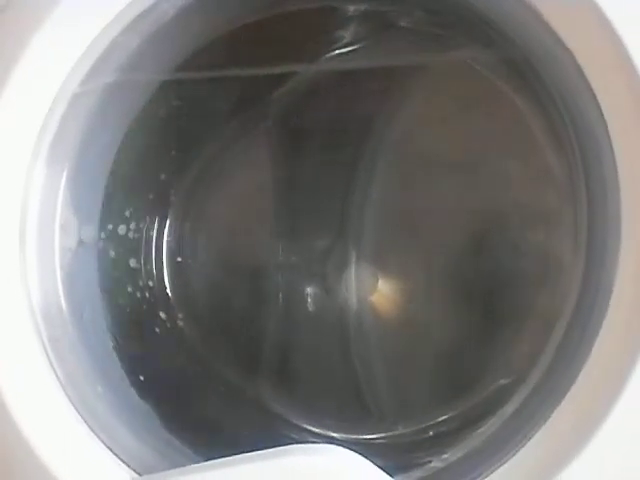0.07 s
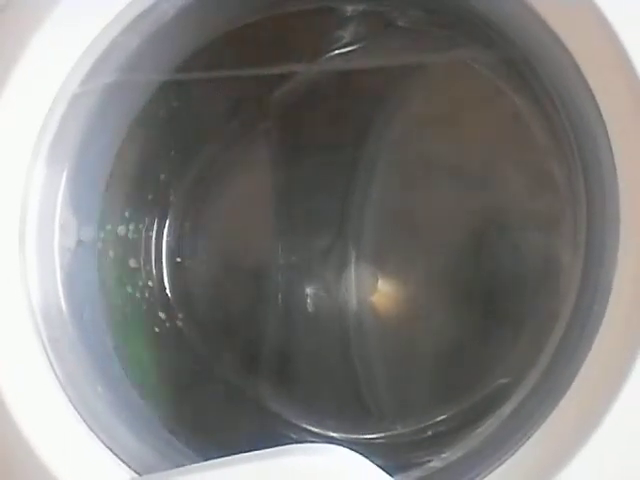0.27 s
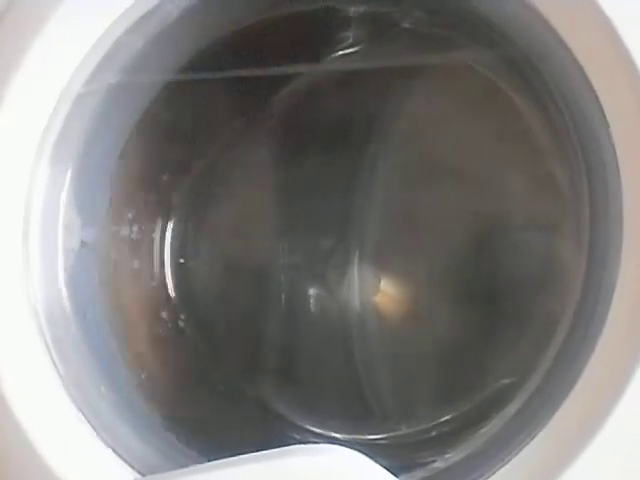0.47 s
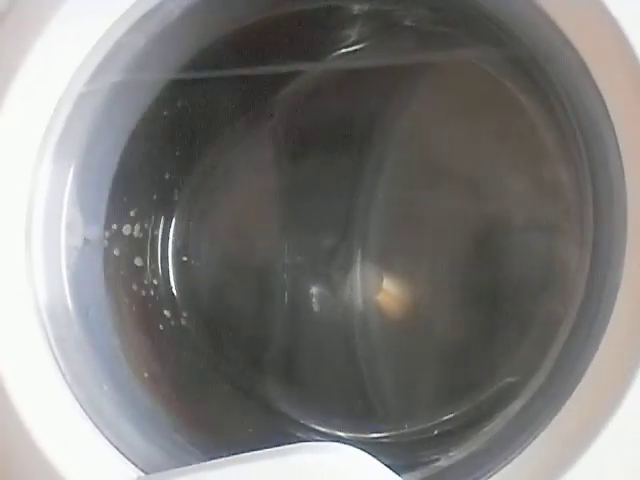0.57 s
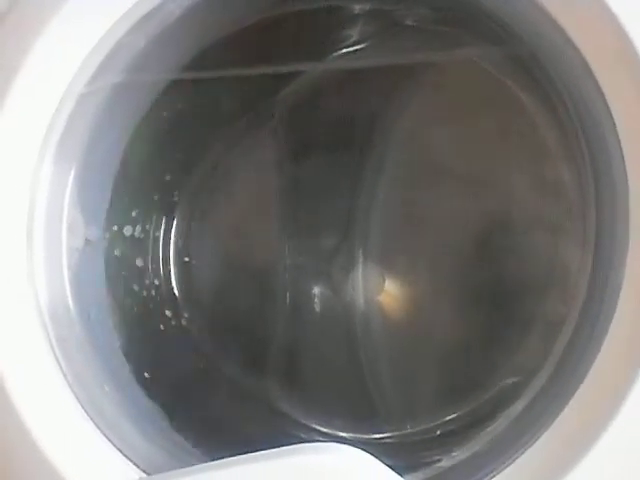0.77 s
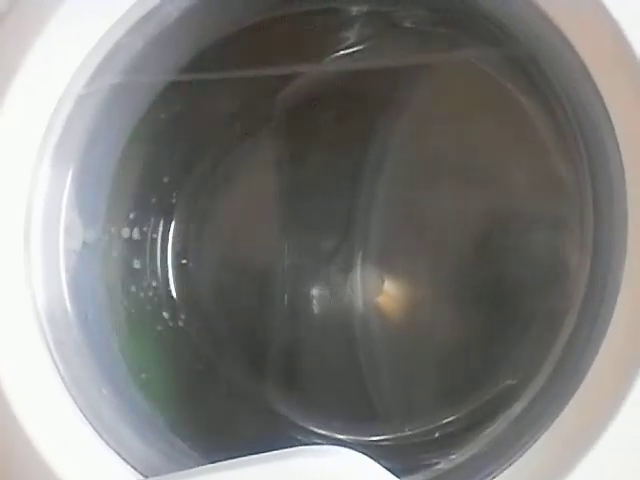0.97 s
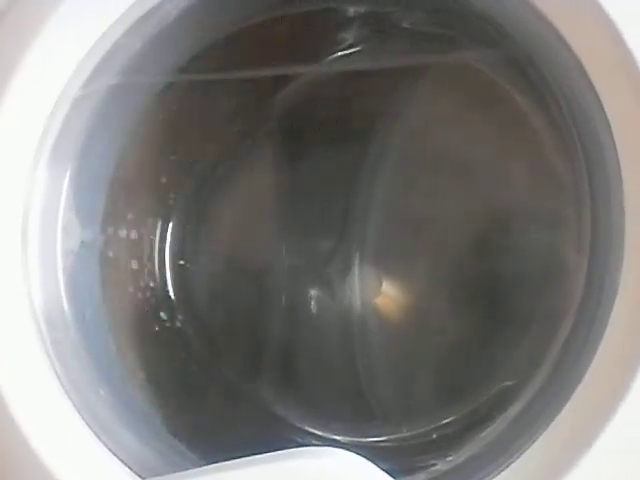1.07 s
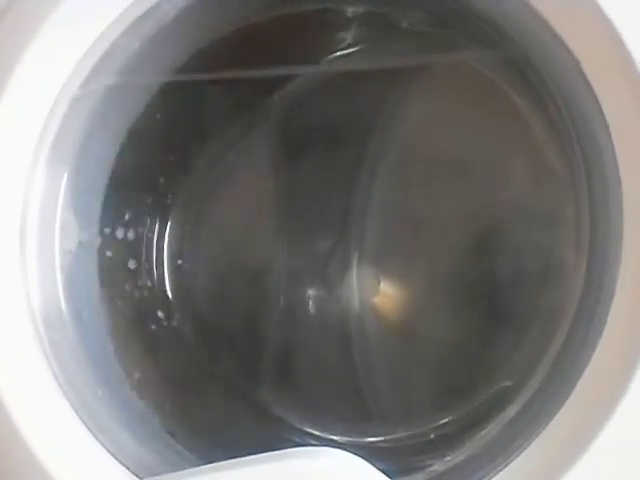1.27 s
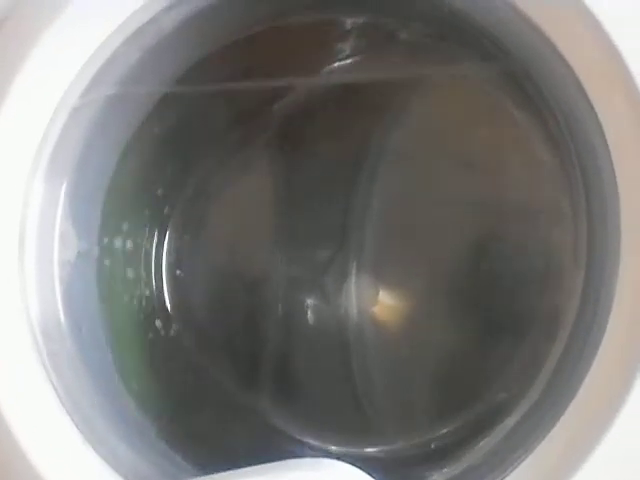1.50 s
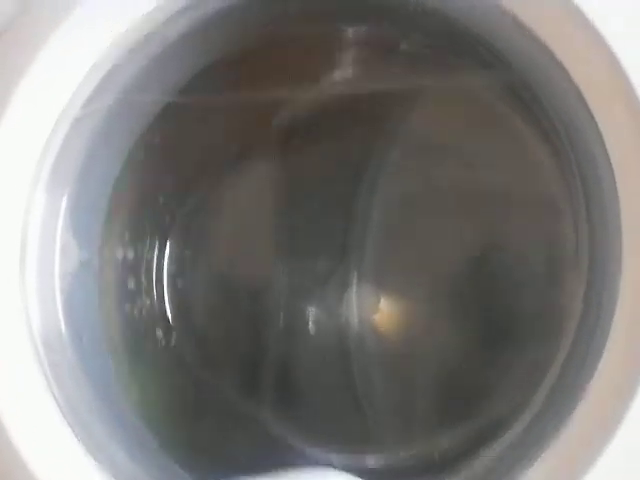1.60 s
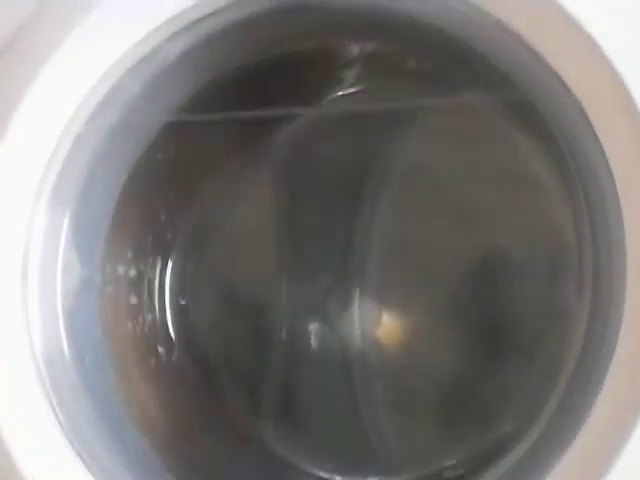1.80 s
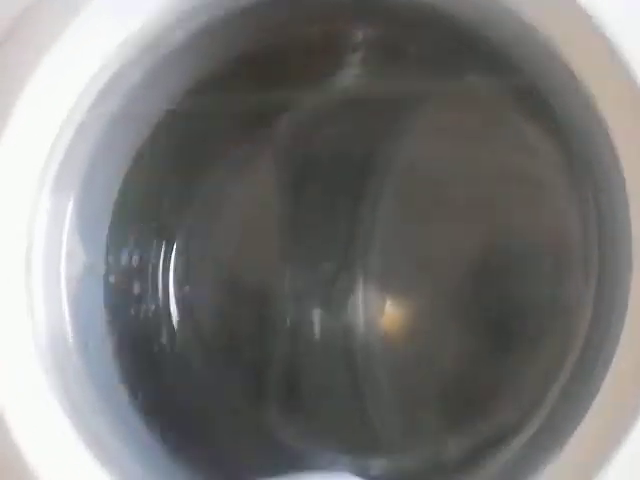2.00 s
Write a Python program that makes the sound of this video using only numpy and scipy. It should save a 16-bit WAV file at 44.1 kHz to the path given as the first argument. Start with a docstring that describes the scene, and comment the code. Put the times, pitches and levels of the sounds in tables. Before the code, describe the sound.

A washing machine hums and rumbles with faint swishing water. A stiff plastic part lets go with a hollow clunk, judders along in scraping clicks over soft thuds, then snaps home. The machine runs on, heard close in a small room.

```python
"""Close on a front-loading washing machine in a small hard room, one narrow-band microphone.
From the start the motor hums, the drum rumbles and water swishes faintly. A quarter second in, a stiff
plastic part, probably a control or latch, lets go with a clunk that rings the hollow front panel.
It judders along, sticking and slipping, while the tub thuds softly, and snaps home near 1.2 s.
The limiter catches both clunks; the room's tail dies away and the machine runs on."""
import sys
import numpy as np
from scipy import signal
from scipy.fft import rfft, irfft, next_fast_len
from scipy.io import wavfile
from scipy.ndimage import minimum_filter1d, map_coordinates

SR = 44100
rng = np.random.default_rng(int(sys.argv[2]) if len(sys.argv) > 2 else 0)


def master(y):
    """Save y as 16-bit WAV."""
    cut = np.clip(np.atleast_2d(y).T, -1, 1)
    pcm = np.round(cut * 32767)  # scale
    wavfile.write(sys.argv[1], SR, pcm.astype(np.int16))


N = 90404

# motor hum lines (frequency [Hz], rms level before the swell [dB], share of the load swell [ratio])
HUM_LINES = [(49.2, -44.5, 0.098), (98.5, -41, 1), (149.9, -40.5, .2), (197.8, -44, 0.95), (302, -43.5, 0),
             (349, -49.5, 0), (397.5, -45.5, 0)]
# swell of the hum's low lines under load (time [s], gain [dB])
LOAD_SWELL = [(0, 0.5), (.28, 2), (.42, -3.5), (.92, 6.5), (1.06, -3.5), (1.36, 3.5), (1.45, -4.5),
              (1.55, 8.5), (1.72, -5.5), (1.87, 1), (2.05, -5)]
# course of the drum's rumble, the water's swish and the part's friction (time [s], level [dB])
RUMBLE_LEVEL = [(0, -39.5), (.55, -34), (.75, -38.5), (1.3, -34.5), (1.7, -40), (2.05, -37)]
WATER_LEVEL = [(0, -39), (.06, -32.5), (.12, -36.5), (.19, -35), (1.3, -31.5), (1.43, -36.5), (1.52, -33.5),
               (1.66, -41.5), (1.72, -37), (1.81, -30.5), (1.93, -37), (2.05, -37.5)]
FRICTION_LEVEL = [(.3, -20.5), (.36, -26.5), (.46, -29.5), (.58, -31), (.665, -22.5), (.697, -31),
                  (.75, -29), (.83, -23.5), (.92, -29.5), (1.01, -30), (1.06, -27), (1.13, -29),
                  (1.19, -37)]
# spectra of the same three noises (frequency [Hz], relative density [dB])
RUMBLE_SPECTRUM = [(15, -29), (30, -27), (42, -9), (53, 0), (90, -5.5), (130, -12.5), (190, -8.5),
                   (260, -16), (350, -5.5), (600, -19.5), (1500, -58.5)]
WATER_SPECTRUM = [(150, 5.5), (350, -9.5), (700, 1.5), (1200, -1), (1750, -9), (2100, -10.5), (2450, -4),
                  (3100, -7.5), (3800, -12)]
FRICTION_SPECTRUM = [(150, -3), (400, 3), (660, 4.5), (860, 12.5), (1050, -9), (1190, -18.5), (1520, 2),
                     (1850, -24.5), (2400, -11.5), (2600, -18), (3000, -11.5), (3450, -5), (3800, -17.5)]
# low modes of the tub (frequency [Hz], relative level [dB], T60 [s])
TUB_MODES = [(72.3, -13.5, .3), (152, -11, 0.15), (125.4, -24.5, 0.28), (225.8, -18.5, 0.16)]
# soft knocks of the tub (time [s], strength [dB])
TUB_KNOCKS = [(.26, -9), (0.546, -10.5), (0.659, 1), (1.2, -11.5)]
# contacts as the part is touched and lets go, slips, snaps home (time [s], strength [dB], treble [dB])
RELEASE_CONTACTS = [(.04, -14.5, -20), (.2245, -11, -1.5), (.229, -6, -1), (.2395, 6, .5), (.2575, 0, 3.5),
                    (.271, -5, 0.5), (.2865, -9.5, -0.5), (.302, -8, 0.5)]
SLIP_CONTACTS = [(.379, -7, 4.5), (.445, -25, 20.5), (.489, -11.5, 6), (.519, 1.5, -2.5),
                 (.541, -2.5, -5.5), (.557, -5.5, -6.5), (.582, -15.5, 6), (.605, -9.5, -3),
                 (.618, -2.5, 3), (.63, -3, -1), (.66, -4.5, -5), (.703, 1, 4), (.73, -6, -7.5),
                 (.762, 3, 0), (.801, 3, 0), (.826, -0.5, -2), (.843, -6.5, -4), (.88, -12, 8.5),
                 (.897, -6, 1.5), (.954, -7, -7), (1.024, -13, 6.5), (1.032, -9, 2), (1.058, -7, 1),
                 (1.1, -8, -14)]
SNAP_CONTACTS = [(1.1605, -11, 4), (1.163, 4.5, -1), (1.174, -12.5, -0.5), (1.182, -11, 1.5),
                 (1.209, -13, -10)]
# dense clatter of each kind of contact (frequency [Hz], relative density [dB])
RELEASE_SPECTRUM = [(100, -27.5), (260, -27), (360, -6), (560, -9.5), (820, 0), (1020, -8.5), (1300, -2),
                    (1900, -15), (2350, -2.5), (2850, -15), (3350, -10.5), (3800, -9.5)]
SLIP_SPECTRUM = [(100, -16), (400, -3), (640, -5), (850, 5.5), (1050, -9), (1170, 8), (1500, -27),
                 (1850, -19.5), (2380, 1), (2550, -9.5), (2950, -22), (3450, -11.5), (3800, -17.5)]
SNAP_SPECTRUM = [(100, -19.5), (260, -2), (400, -18.5), (600, -1), (850, 2), (1020, -2.5), (1420, 1),
                 (1800, -10), (2350, 0.5), (2900, -9.5), (3300, -3.5), (3800, -4.5)]
# front panel modes, one list each: (frequency [Hz]) and (nominal T60 [s])
PANEL_MODE_HZ = [388, 755, 821, 863, 937, 1157, 1248, 1422, 1495, 1690, 2125, 2326, 2372, 2429, 3081, 3205,
                 3374, 3690]
PANEL_MODE_T60 = [0.16, 0.3, 0.27, 0.24, 0.3, 0.28, 0.28, 0.19, 0.32, 0.72, 0.091, 0.32, 0.23, 0.26, 0.23,
                  0.28, 0.31, 0.24]
# how hard each kind of contact drives those modes (relative level [dB])
RELEASE_MODE_DB = [-4, -1.5, -1, -8, -27, -8.5, 2.5, -1, 0.5, -18.5, -22.5, -3.5, -6, -4, -3, -10, -3.5,
                   -12]
SLIP_MODE_DB = [-14, -4, 0.5, 3, -9, -5, -12, -7, -22, -27, -10.5, -18.5, -9, -17, -35.5, -22, -17.5, -30]
SNAP_MODE_DB = [-6.5, -12, -6, -7.5, -15, -0.5, -13, 5.5, -6.5, -18.5, -22.5, -6, -22, -8.5, -21.5, -9,
                -11.5, -11]
# microphone response, falling steeply above 3.8 kHz (frequency [Hz], gain [dB])
MIC_RESPONSE = [(20, -1.5), (3780, 0), (3880, -7.5), (3990, -16), (4270, -14), (4420, -26.5), (4650, -51),
                (5200, -104.5)]

HUM_WAVER_DB, HUM_WAVER_RAD = 1.6, .35
THUD_ATTACK_S, ROOM_T60_S = .011, .36
MODE_SCATTER_DB, MODE_DETUNE, TREBLE_CORNER_HZ = 2.0, .005, 1280
LIMITER_ATTACK_S, LIMITER_HOLD_S, CLIP_LEVEL, LOWPASS_HZ = .0012, .01, .7, 15500


def amp(db):
    """Decibels to gain."""
    return 10 ** (np.asarray(db) / 20)


def unit_rms(x):
    """Scale to rms 1."""
    return x / np.sqrt(np.mean(x ** 2) + 1e-20)


def envelope(points):
    """Gain per sample from (time [s], level [dB]) points."""
    return amp(np.interp(np.arange(N) / SR, *np.transpose(points)))


def wobble(knots_per_s):
    """A smooth curve through random knots."""
    knots = rng.standard_normal(int(N * knots_per_s / SR) + 4)
    return map_coordinates(knots, [np.arange(N) * knots_per_s / SR])


def gain_at(points, hz):
    """Gain from (frequency [Hz], level [dB]) points on a log frequency axis."""
    point_hz, db = np.transpose(points)
    return amp(np.interp(np.log(hz + 1), np.log(point_hz + 1), db))


def filtered(x, response):
    """Filter x by a gain given as a function of frequency."""
    size = next_fast_len(len(x) + 8192)
    return irfft(rfft(x, size) * response(np.fft.rfftfreq(size, 1 / SR)), size)[:len(x)]


def noise(spectrum, size):
    """Coloured noise of rms 1, cut off at 5 kHz."""
    white = rng.standard_normal(size)
    return unit_rms(filtered(white, lambda hz: gain_at(spectrum, hz) * (hz < 5000)))


def motor():
    """The bed: hum near multiples of the mains frequency. All lines waver; some swell with the load."""
    t, hum = np.arange(N) / SR, np.zeros(N)
    for hz, db, load_share in HUM_LINES:
        phase = 2 * np.pi * (hz * t + rng.random()) + HUM_WAVER_RAD * wobble(8.84)
        peak = np.sqrt(2) * amp(db + HUM_WAVER_DB * wobble(6.53))
        hum += envelope(LOAD_SWELL) ** load_share * peak * np.sin(phase)
    return hum


def drum():
    """The turning drum rumbles unevenly, with a faint swish of water inside."""
    water = unit_rms(noise(WATER_SPECTRUM, N) * amp(1.1 * wobble(90)))
    rumble = unit_rms(noise(RUMBLE_SPECTRUM, N) * amp(1.9 * wobble(9.66)))
    return envelope(RUMBLE_LEVEL) * rumble + envelope(WATER_LEVEL) * water


def tub():
    """Soft knocks set the tub's low modes ringing."""
    thuds = np.zeros(N)
    for start_s, strength_db in TUB_KNOCKS:
        t = np.maximum(np.arange(N) / SR - start_s, 0)
        ring = sum(amp(db - 60 * t / t60) * np.sin(2 * np.pi * hz * t) for hz, db, t60 in TUB_MODES)
        thuds += amp(strength_db) * (1 - np.exp(-t / THUD_ATTACK_S)) * ring
    return thuds


def treble_shelf(hz, db):
    """Gain of a high shelf: each contact carries its own amount of treble above the corner."""
    return amp(db / (1 + (TREBLE_CORNER_HZ / (hz + 1)) ** 6))


def panel(contacts, mode_db, spectrum, attack_s, ring_db, t60_scale, clatter_db, clatter_t60, room_db):
    """Each contact rings the hollow panel a little differently, with brief clatter and a room tail."""
    track, t = np.zeros(N + SR), np.arange(SR * 3 // 5) / SR
    hz, t60, db = np.array([PANEL_MODE_HZ, PANEL_MODE_T60, mode_db])[:, :, None]
    ring_decay = amp(db + ring_db - 60 * t / (t60 * t60_scale))
    clatter_decay = amp(clatter_db - 60 * t / clatter_t60)
    room_tail = amp(room_db - 60 * t / ROOM_T60_S) * (1 - np.exp(-t / .0063))
    for start_s, strength_db, treble_db in contacts:
        phase = rng.uniform(0, 2 * np.pi, hz.shape)
        pitch = hz * (1 + MODE_DETUNE * rng.uniform(-1, 1, hz.shape))
        drive = amp(MODE_SCATTER_DB * rng.standard_normal(hz.shape)) * treble_shelf(hz, treble_db)
        ring = np.sum(ring_decay * drive * np.sin(2 * np.pi * pitch * t + phase), axis=0)
        burst = filtered(noise(spectrum, len(t)), lambda f: treble_shelf(f, treble_db))
        clatter = (clatter_decay + room_tail) * burst
        onset = amp(strength_db) * (1 - np.exp(-t / attack_s))
        track[round(start_s * SR):][:len(t)] += onset * (ring + clatter)
    return track[:N]


def judder():
    """The plastic part sticks and slips, tapping the panel over grainy sliding friction."""
    slips = panel(SLIP_CONTACTS, SLIP_MODE_DB, SLIP_SPECTRUM, attack_s=.001,
                  ring_db=-19.5, t60_scale=.98, clatter_db=-18, clatter_t60=.048, room_db=-26.5)
    t = np.arange(N) / SR
    sliding = (t > FRICTION_LEVEL[0][0]) & (t < FRICTION_LEVEL[-1][0])
    friction = unit_rms(noise(FRICTION_SPECTRUM, N) * amp(2.1 * wobble(120)))
    return slips + sliding * envelope(FRICTION_LEVEL) * friction


def clunks():
    """Up front: the part lets go and later snaps home, chattering both times and ringing the panel."""
    release = panel(RELEASE_CONTACTS, RELEASE_MODE_DB, RELEASE_SPECTRUM, attack_s=.0007,
                    ring_db=-23, t60_scale=1.08, clatter_db=-11.5, clatter_t60=.074, room_db=-18)
    snap = panel(SNAP_CONTACTS, SNAP_MODE_DB, SNAP_SPECTRUM, attack_s=.00027,
                 ring_db=-15, t60_scale=.94, clatter_db=-16.5, clatter_t60=.1, room_db=-15)
    return release + snap


def scene():
    """The whole machine in mono, from one close microphone position."""
    return (clunks() + judder() + motor() + drum() + tub())[None]


def record(dry):
    """Narrow-band microphone into a fast limiter: a clunk's first peak clips, the rest is held down."""
    mic = filtered(dry[0], lambda hz: gain_at(MIC_RESPONSE, hz))
    safe_gain = CLIP_LEVEL / np.maximum(abs(mic), CLIP_LEVEL)
    hold = int(LIMITER_HOLD_S * SR)
    reduction = 1 - minimum_filter1d(safe_gain, hold, origin=(hold - 1) // 2)
    pole = np.exp(-1 / (LIMITER_ATTACK_S * SR))
    limited = mic * (1 - signal.lfilter([1 - pole], [1, -pole], reduction))
    clipped = np.clip(limited, -CLIP_LEVEL, CLIP_LEVEL)
    return filtered(clipped, lambda hz: 1 / (1 + (hz / LOWPASS_HZ) ** 60))[None]


dry = scene()
out = record(dry)
master(out)
```